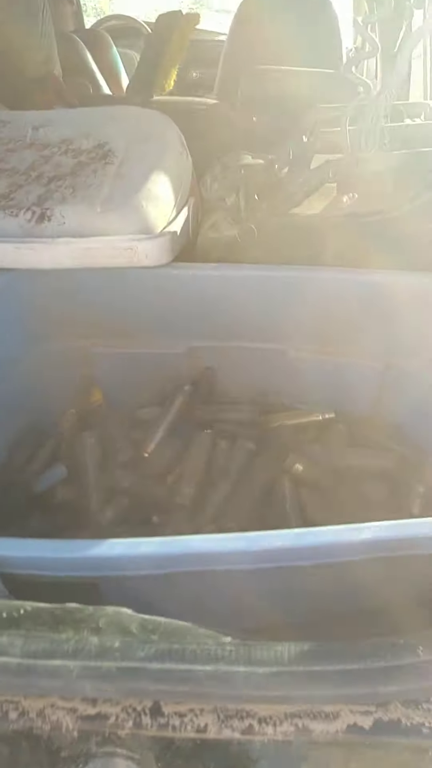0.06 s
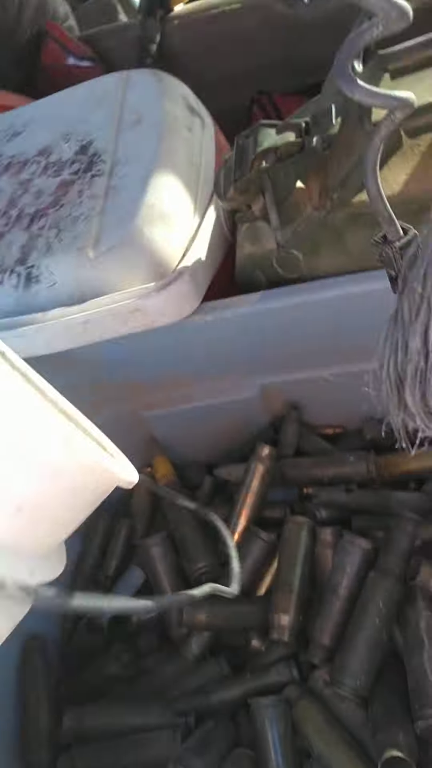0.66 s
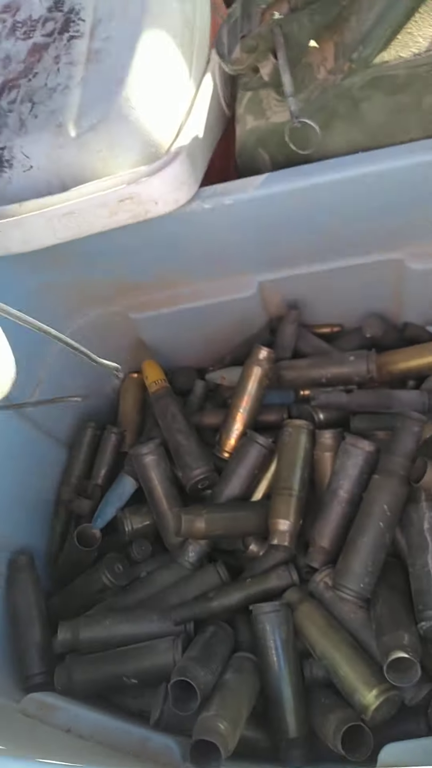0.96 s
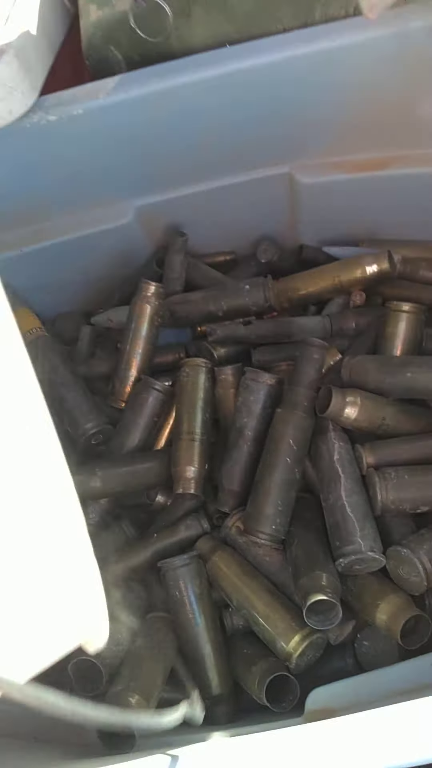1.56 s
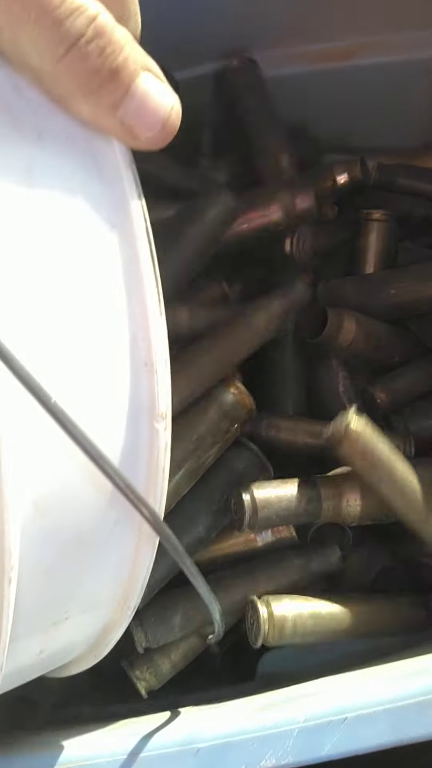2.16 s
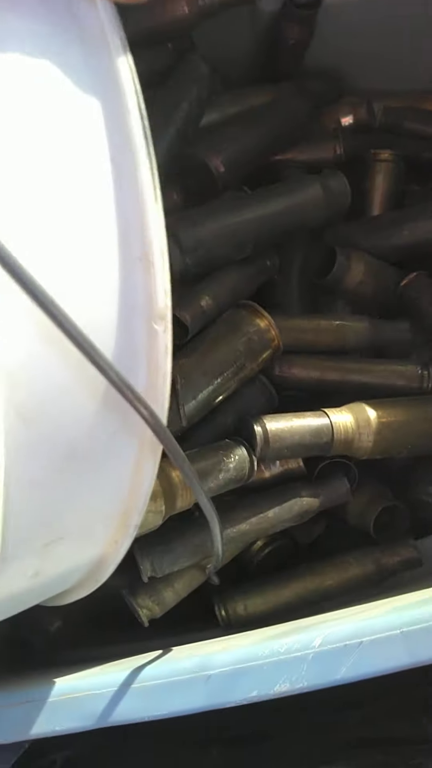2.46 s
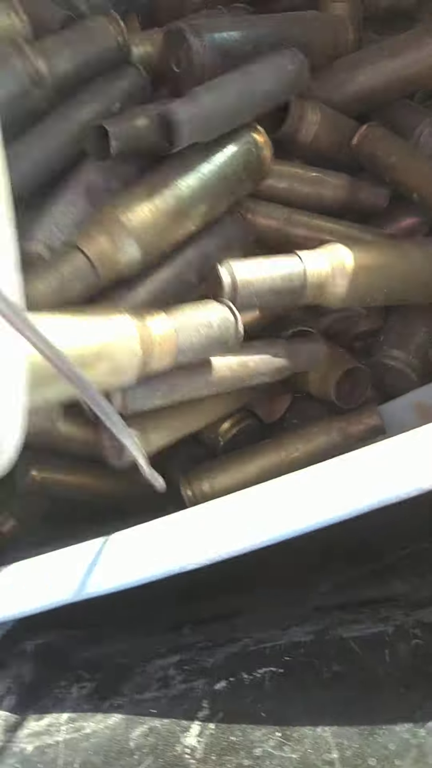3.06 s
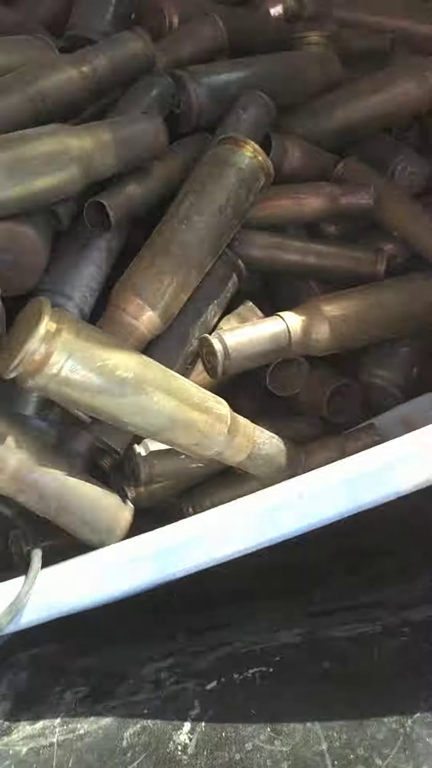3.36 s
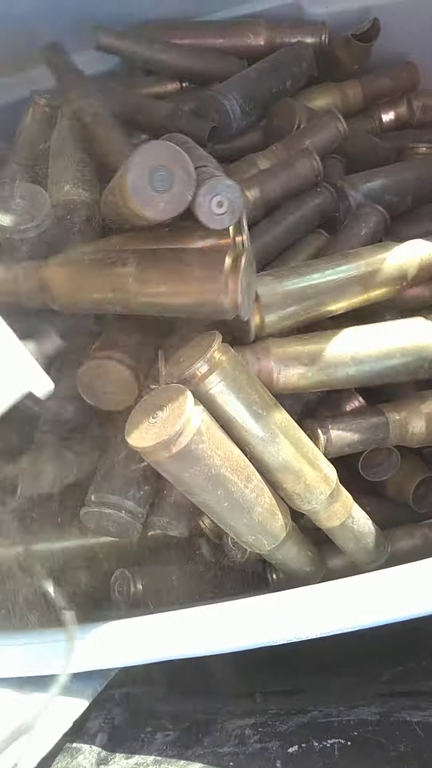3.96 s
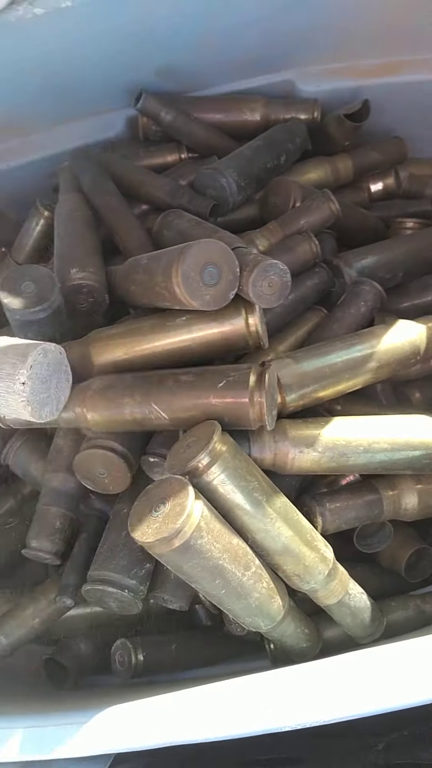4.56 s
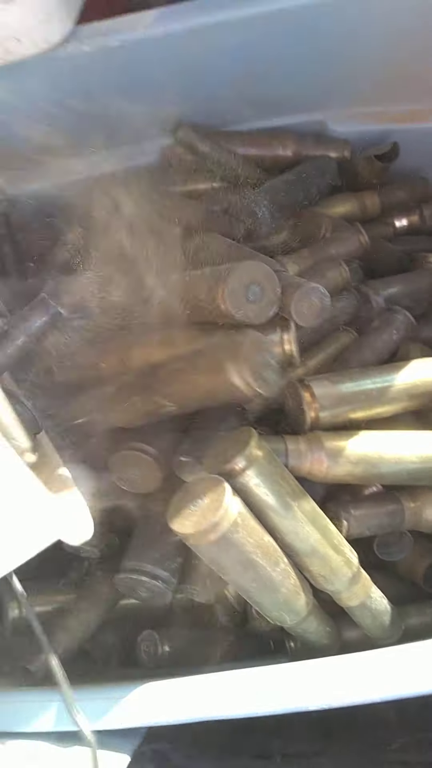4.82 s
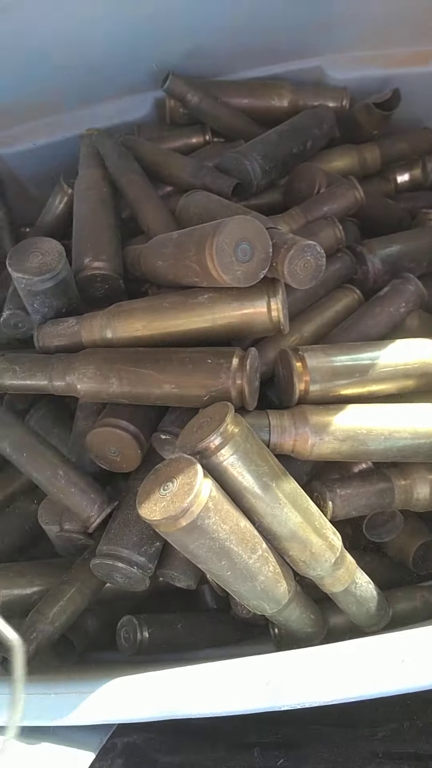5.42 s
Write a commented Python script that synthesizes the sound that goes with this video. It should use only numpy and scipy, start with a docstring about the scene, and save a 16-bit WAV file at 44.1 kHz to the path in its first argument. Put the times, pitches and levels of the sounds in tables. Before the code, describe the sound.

Empty metal shell casings slide out of a bucket and tumble onto a heap in a plastic bin, jingling and knocking.

```python
"""Outdoors, close to a plastic tote, on one small microphone: spent brass casings are poured from a
plastic bucket onto the heap inside. They slide and knock along the bucket wall, click on the heap
and ring with the few modes of a short tube; the tote booms under their weight.
The last ones drop singly and ring out over faint open air."""
import sys
import numpy as np
from scipy import signal
from scipy.fft import rfft, irfft
from scipy.io import wavfile
from scipy.ndimage import uniform_filter1d

SR = 44100
rng = np.random.default_rng(int(sys.argv[2]) if len(sys.argv) > 2 else 0)


def to_wav(sig):
    """Store sig (one row per channel, or 1-D mono) as 16-bit WAV at the path in sys.argv[1].

    Samples outside -1..1 are clipped; the rate is SR.
    """
    pcm = np.clip(np.atleast_2d(sig), -1, 1) * 32767
    pcm = np.round(pcm).astype(np.int16)
    wavfile.write(sys.argv[1], SR, pcm.T)  # frames by channels


N = 250929
TIME = np.arange(N) / SR

# batches of casings letting go: (start [s], length [s], bucket rattle [dB], brass jingle [dB],
# lowest brass mode [dB], heap clicking [dB])
SLIDES = [(-0.02, 0.16, -37, -44.5, -53.5, -49), (0.449, 0.078, -26.5, -40.5, -38, -37.5),
          (0.802, 0.21, -31, -35.5, -35, -35.5), (1.545, 0.19, -30, -33, -42, -38.5),
          (1.711, 0.13, -28.5, -27, -29.5, -27.5), (1.855, 0.13, -29, -26.5, -30, -31),
          (2.0, 0.46, -37, -25, -33.5, -35.5), (2.64, 0.28, -40, -46, -51.5, -52),
          (2.955, 0.33, -37.5, -46, -63, -50.5), (3.133, 0.077, -23.5, -29, -36, -31.5),
          (3.24, 0.095, -27, -32, -45, -35.5), (3.357, 0.11, -32.5, -31, -46.5, -38.5),
          (3.58, 0.15, -28.5, -39.5, -49, -39.5), (3.8, 0.28, -32, -28, -64, -35),
          (4.352, 0.08, -45, -66, -55, -51), (4.521, 0.14, -47, -41.5, -57, -44),
          (4.691, 0.19, -28.5, -36.5, -37, -39), (4.876, 0.11, -30, -28.5, -48.5, -34.5)]
# casings bouncing clear: (time [s], top mode [dB], second mode [dB], second mode [Hz],
# third mode [dB], t60 [s])
RINGS = [(0.0, -40, -34, 4970, -48, 0.44), (0.69, -38.5, -69, 4900, -48, 0.3),
         (1.286, -26.5, -44, 4850, -26, 0.31), (1.315, -29.5, -29, 4990, -32, 0.57),
         (1.75, -27, -17, 4950, -34, 0.13), (2.039, -18, -28.5, 5000, -36, 0.31),
         (2.315, -17, -27.5, 5160, -42, 0.13), (2.369, -21, -18, 4950, -18.5, 0.25),
         (2.455, -20, -20, 4990, -37, 0.13), (2.572, -22, -27, 4900, -42, 0.11),
         (2.824, -39.5, -51, 4900, -45, 0.8), (3.448, -26, -22, 4950, -35, 0.2),
         (3.778, -26, -32.5, 4800, -26, 1), (3.808, -15, -16, 4810, -15, 0.12),
         (3.985, -19.5, -29, 4800, -21, 0.3), (4.02, -20, -24, 5020, -30, 0.16),
         (4.226, -34.5, -40, 5070, -32.5, 0.26), (4.861, -20.5, -29, 4730, -26, 0.25),
         (5.018, -35, -22.5, 4890, -41, 0.46), (5.413, -27, -50, 4950, -54, 0.19),
         (5.461, -37, -35.5, 4870, -29, 0.33), (5.604, -33, -38, 4880, -45, 0.86)]
# half-damped casings: (time [s], level [dB], pitch [Hz], t60 [s])
CLINKS = [(0.309, -23.5, 3010, 0.037), (0.391, -23, 4550, 0.033), (0.651, -28, 2940, 0.044),
          (1.002, -28, 3090, 0.15), (1.135, -27.5, 3970, 0.15), (1.194, -28.5, 3990, 0.1),
          (1.721, -16.5, 4210, 0.079), (2.022, -17.5, 3090, 0.14), (2.331, -20, 3194, 0.11),
          (3.296, -13, 1910, 0.068), (4.054, -17, 1950, 0.043), (4.138, -21, 3260, 0.046),
          (4.253, -17, 2950, 0.022), (4.495, -20.5, 4020, 0.034), (4.574, -25.5, 4160, 0.04),
          (4.6, -28, 3080, 0.043), (4.623, -22, 3270, 0.028), (4.652, -19.5, 3290, 0.025),
          (5.178, -29, 3170, 0.072), (5.412, -26, 4030, 0.04), (5.594, -17, 1910, 0.058)]
# modes of the loaded tote: (pitch [Hz], level [dB], t60 [s])
TOTE_MODES = [(54, -41.5, 0.098), (67, -6, 0.29), (84.4, -17.5, 0.15), (97, -2.5, 0.16), (125, 1.5, 0.87),
              (148.8, -7, 0.24), (182.2, -1, 0.11), (204.6, -16, 0.75), (240, -3.5, 0.041),
              (269.4, -7, 0.092), (308.7, -3.5, 0.078), (355, -6.5, 0.15), (392.6, -1, 0.076),
              (447, -8, 0.11), (511, -6, 0.053), (510, -4.5, 0.021), (612, -0.5, 0.014)]
# colours of the bucket wall and of the brass heap: (frequency [Hz], spectral density [dB])
BUCKET_COLOUR = [(520, -0.5), (780, 5.5), (1000, 6.5), (1150, 2.5), (1350, 7.5), (1700, -0.5), (2000, 3.5),
                 (2400, -2), (3000, -4.5)]
HEAP_COLOUR = [(2400, -30), (3000, 13.5), (3500, 6.5), (4100, 5), (4900, 8.5), (5500, 5), (6400, 5.5),
               (7200, 2), (7800, -11), (8400, -21.5)]


def tumbling(tote_db, bucket_db, heap_db):
    """One stream of touches shakes the tote, rattles along the bucket wall and crackles on the heap."""
    # the rumble deepens as the load shifts from the bucket into the tote: (time [s], centre [Hz])
    rumble_centre = [(0.0, 286), (1.2, 253), (2.1, 125), (2.8, 150), (3.7, 109), (5.0, 121), (5.6, 74)]
    times, sizes = contacts(bucket_db, base_per_s=520, extra_per_s=380, spread_db=3)
    centre_hz = np.interp(times, *np.transpose(rumble_centre))
    tote = body(times, sizes, TOTE_MODES, uneven_db=5.5, aim_hz=centre_hz, db_per_octave=6)
    bucket = body(times, sizes, crowded_modes(BUCKET_COLOUR, t60=0.047, count=36), uneven_db=7)
    heap = body(times, sizes, crowded_modes(HEAP_COLOUR, t60=0.016, count=48), uneven_db=-0.5)
    return (from_db(tote_db - 1) * steady(tote, span_s=0.13)
            + from_db(bucket_db + 0.5) * steady(bucket, span_s=0.075)
            + from_db(heap_db + 2) * steady(heap, span_s=0.084))


def jingling(upper_db, lowest_db, width_hz=420, count=9):
    """Casings of nearly one size strike each other; their slightly unequal modes beat."""
    # modes of a casing: (pitch [Hz], level [dB], t60 [s], pitch spread between casings [share])
    tube_modes = [(3090, 0, 0.12, 0.037), (3950, -10.5, 0.28, 0.13), (4950, 0.5, 0.18, 0.018),
                  (5970, -8.5, 0.13, 0.026), (6180, -9, 0.37, 0.019), (6553, 0, 0.13, .006),
                  (7500, -11.5, 0.27, 0.18)]
    out = np.zeros(N)
    # the lowest mode sounds mainly when casings tumble loose, so it has a level of its own
    for level_db, modes in (upper_db - 0.5, tube_modes[1:]), (lowest_db + 0.5, tube_modes[:1]):
        times, sizes = contacts(level_db, base_per_s=130, extra_per_s=360, spread_db=3.5)
        struck = rng.integers(0, count, len(times))
        jingle = np.zeros(N)
        for hz, db, t60, spread in modes:
            chorus = np.zeros(N)
            offsets = rng.permutation(np.linspace(-1, 1, count)) + rng.normal(0, 0.18, count)
            for casing, offset in enumerate(offsets):
                hits = struck == casing
                force = clicks(times[hits], sizes[hits] * rng.standard_normal(hits.sum()))
                # a casing pressed by its neighbours is more out of tune and dies sooner
                pressed = 1 + abs(offset)
                chorus += ring(force, hz * (1 + spread * offset * pressed / 2), t60 / pressed)
            # the ring takes a moment to build up, so it stays narrow around its mode
            band_hz = [hz - width_hz / 2, hz + width_hz / 2]
            narrow = signal.butter(1, band_hz, "band", fs=SR, output="sos")
            jingle += from_db(db) * signal.sosfilt(narrow, chorus)
        out += from_db(level_db) * steady(jingle, span_s=0.05)
    return out


def landings(bucket_db, bounce_s=0.0051, bounce_db=-5):
    """A casing lands on one end, then slaps down with the other a moment later."""
    # the hardest landings: (time [s], clack [dB], clack pitch [Hz], tote [dB], heap click [dB])
    hard_knocks = [(0.26, -24.5, 1560, -35, -35), (0.391, -19.5, 2120, -57, -24),
                   (0.42, -14.5, 1950, -40.5, -27), (0.467, -8.5, 2270, -23, -20),
                   (0.482, -20, 750, -17, -38), (0.513, -13, 1470, -25, -31), (0.585, -28, 1310, -47, -36),
                   (0.785, -17.5, 2650, -29.5, -30), (0.836, -11, 2160, -31, -37),
                   (0.845, -17, 1380, -27, -41), (0.902, -16.5, 2180, -17, -21),
                   (0.936, -15, 1480, -23, -33), (1.078, -12, 1510, -26, -37), (1.105, -14, 2420, -22, -32),
                   (1.165, -14, 1470, -49, -39), (1.23, -20, 1580, -28.5, -33),
                   (1.285, -24.5, 1920, -42, -23.5), (1.304, -23, 790, -30, -23),
                   (1.362, -15.5, 1190, -22, -21.5), (1.427, -19.5, 2100, -57, -29.5),
                   (1.484, -25.5, 720, -26, -43), (1.556, -15.5, 791, -28.5, -27.5),
                   (1.613, -11, 1560, -20.5, -30), (1.697, -13.5, 1420, -19, -21.5),
                   (1.933, -13.5, 1490, -28, -21), (2.208, -21.5, 990, -34, -18.5),
                   (2.289, -30, 950, -24, -38), (2.367, -19.5, 950, -23.5, -45),
                   (2.451, -31, 1170, -22, -24.5), (2.571, -36, 1200, -46, -23.5),
                   (2.824, -21, 826, -36, -28), (3.155, -7, 1076, -28, -18.5), (3.185, -6, 1640, -25, -23),
                   (3.282, -6.5, 1980, -23, -27), (3.297, -7.5, 1470, -17.5, -26),
                   (3.307, -9, 1530, -39.5, -31), (3.372, -13, 1260, -25.5, -30),
                   (3.591, -20.5, 1900, -31.5, -33), (3.697, -17, 1020, -28.5, -25),
                   (3.725, -17, 1660, -34, -18.5), (3.778, -16, 1360, -35, -23),
                   (3.955, -17, 1310, -19.5, -22.5), (4.092, -20.5, 920, -27, -38),
                   (4.223, -27, 2800, -48, -31), (4.541, -22.5, 1223, -29.5, -30),
                   (4.622, -34, 1470, -35, -27), (4.652, -33, 2190, -46, -27.5),
                   (4.689, -12.5, 1920, -41, -33), (4.701, -12, 1296, -27.5, -27.5),
                   (4.759, -8, 1270, -25.5, -29), (4.816, -19, 985, -28, -39),
                   (4.844, -9, 1010, -19.5, -27), (4.913, -11, 1490, -36, -16),
                   (5.061, -26.5, 813, -33, -30.5), (5.177, -26.5, 1390, -36, -37.5),
                   (5.334, -35, 2200, -50, -40.5), (5.594, -21.5, 1870, -34, -26.5),
                   (5.668, -26.5, 2010, -34.5, -33)]
    s, clack_db, clack_hz, tote_db, heap_db = np.vstack([stray_knocks(bucket_db), hard_knocks]).T
    times = np.column_stack([s, s + bounce_s * rng.uniform(0.6, 1.4, len(s))]).ravel()
    pair_db = np.array([0, bounce_db])
    wall_modes = crowded_modes(BUCKET_COLOUR, t60=0.042, count=36)
    tote = body(times, from_db(tote_db[:, None] + pair_db + 22).ravel(), TOTE_MODES,
                uneven_db=0, aim_hz=360, db_per_octave=9.5)
    bucket = body(times, from_db(clack_db[:, None] + pair_db + 14.5).ravel(), wall_modes,
                  uneven_db=3, aim_hz=np.repeat(clack_hz, 2), db_per_octave=9)
    heap_modes = crowded_modes(HEAP_COLOUR, t60=0.075, count=44)
    heap = body(times, from_db(heap_db[:, None] + pair_db + 21.5).ravel(), heap_modes, uneven_db=11)
    hollow_note = tones(s, clack_db - 0.5, clack_hz, np.full(len(s), 0.022), rise_s=0.0025)
    return tote + bucket + heap + hollow_note


def stray_knocks(bucket_db, count=36, low_hz=750, high_hz=2200, above_db=7, scatter_db=10):
    """Rows for lesser landings at random, as strong as the flow allows."""
    when, pitch, strength = rng.random((count, 3)).T
    s = (np.arange(count) + when) / count * N / SR
    clack_db = np.interp(s, TIME, bucket_db) + above_db + scatter_db * (2 * strength - 1)
    clack_hz = low_hz * (high_hz / low_hz) ** pitch
    tote_db, heap_db = clack_db - 9, clack_db - 15
    return np.column_stack([s, clack_db, clack_hz, tote_db, heap_db])


def free_casings(first_hz=3080, third_hz=6170, top_hz=6510, pitch_spread=0.007):
    """A casing in the air rings on with four tube modes, the lowest dying first."""
    s, top_db, second_db, second_hz, third_db, t60 = np.transpose(RINGS)
    tuning = 1 + pitch_spread * rng.standard_normal((len(s), 3)).T
    first = tones(s, top_db - 6, first_hz * tuning[0], t60 * 0.38, rise_s=0.002)
    second = tones(s, second_db - 0.5, second_hz, t60, rise_s=0.0012)
    third = tones(s, third_db, third_hz * tuning[1], t60, rise_s=0.0089)
    top = tones(s, top_db - 0.5, top_hz * tuning[2], t60, rise_s=0.0025)
    return first + second + third + top


def clinking():
    """A half-damped casing sounds one short note."""
    return tones(*np.transpose(CLINKS), rise_s=0.0005)


def heap_clicks():
    """Brass meets brass: the sharp click at the start of a clink or a ring."""
    s, db = np.transpose([row[:2] for row in [*RINGS, *CLINKS]])
    return body(s, from_db(db + 13), crowded_modes(HEAP_COLOUR, t60=0.046, count=40), uneven_db=2)


def chinking(heap_db):
    """Sparser, harder touches: a casing wedged in the heap chinks briefly at a pitch of its own."""
    times, sizes = contacts(heap_db, base_per_s=40, extra_per_s=90, spread_db=3)
    chinks = body(times, sizes, crowded_modes(HEAP_COLOUR, t60=0.085, count=56), uneven_db=18)
    return from_db(heap_db + 1) * steady(chinks, span_s=0.07)


def tote_booms():
    """The tote wall booms under a blow, one low mode standing out."""
    # blows on the wall: (time [s], level [dB], pitch [Hz], t60 [s])
    blows = [(0.471, -9, 189, 0.17), (0.904, -18, 189, 0.15), (0.923, -15.5, 215, 0.2),
             (1.098, -14.5, 107, 0.072), (1.395, -11.5, 67, 0.084), (2.219, -6, 124, 0.064),
             (2.377, -9, 355, 0.046), (2.384, -10.5, 113, 0.13), (3.171, -12, 115, 0.15),
             (3.297, -21, 120, 0.18), (3.448, -10, 162, 0.067), (3.724, -16, 130, 0.23),
             (4.845, -16, 125, 0.29)]
    s, db, hz, t60 = np.transpose(blows)
    return tones(s, db - 2.5, hz, t60, rise_s=0.0028)


def open_air(rms_db=-47):
    """A faint outdoor rumble and hiss behind the pour."""
    # colour of the air: (frequency [Hz], spectral density [dB])
    air_colour = [(18, -36), (30, -2), (104, 18), (219, -14.5), (532, -4.5), (1390, -6.5), (1670, -39),
                  (4060, -31), (4780, -4), (6330, -30), (8000, -27.5), (10400, -50.5), (17600, -120)]
    hz = np.maximum(np.fft.rfftfreq(N, 1 / SR), 1)
    noise = irfft(rfft(rng.standard_normal(N)) * from_db(at_hz(air_colour, hz)), N)
    return from_db(rms_db) * noise / np.std(noise)


def sliding(levels_db, creep_db, release_db_per_s=136, sag_db_per_s=13, attack_s=0.011):
    """Level in dB of all slides over the creeping load: each starts quickly, loses pace and dies."""
    power = from_db(creep_db) ** 2
    for (start, length, *_), db in zip(SLIDES, levels_db):
        age = np.maximum(TIME - start, 0)
        fall_db = sag_db_per_s * age + release_db_per_s * np.clip(age - length, 0, 1)
        power += (from_db(db - fall_db) * (1 - np.exp(-age / attack_s))) ** 2
    return 10 * np.log10(power)


def contacts(flow_db, base_per_s, extra_per_s, spread_db, count=7000):
    """Random touches, most of them slight; they come faster as the flow swells."""
    position, chance, size = rng.random((count, 3)).T
    times = position * N / SR
    flow = from_db(np.interp(times, TIME, flow_db) - np.max(flow_db))
    happens = chance < (base_per_s + extra_per_s * flow) * N / SR / count
    return times, happens * from_db(spread_db * np.minimum(-np.log(size + 1e-9), 3))


def body(times, sizes, modes, uneven_db, aim_hz=1000, db_per_octave=0):
    """Each contact rings the modes with strengths of its own. A unit blow has energy 1."""
    pitches, levels, t60s = np.transpose(modes)
    swing, favour = rng.standard_normal((len(times), 2, len(modes))).transpose(1, 0, 2)
    # the struck spot favours a few modes; an aimed blow is weaker away from its pitch
    octaves = abs(np.log2(pitches / np.reshape(aim_hz, (-1, 1))))
    shares = swing * from_db(levels + uneven_db * favour - db_per_octave * octaves)
    shares /= np.linalg.norm(shares, axis=1, keepdims=True)
    heights = shares * np.sqrt(4 * np.log(1000) / (t60s * SR))
    return sum(ring(clicks(times, sizes * height), hz, t60)
               for height, hz, t60 in zip(heights.T, pitches, t60s))


def crowded_modes(colour, t60, count):
    """Many close modes, the high ones dying sooner: (pitch [Hz], level [dB], t60 [s])."""
    edges = np.geomspace(colour[0][0], colour[-1][0], count + 1)
    pitches = edges[:-1] + np.diff(edges) * rng.random(count)
    levels = at_hz(colour, pitches) + 10 * np.log10(np.diff(edges))
    return np.column_stack([pitches, levels, t60 * np.sqrt(edges[count // 2] / pitches)])


def tones(times, levels_db, pitches_hz, t60s, rise_s):
    """One sine for each blow; it swells while the contact chatters, then dies."""
    out = np.zeros(N)
    for s, db, hz, t60 in zip(times, levels_db, pitches_hz, t60s):
        start = max(int(s * SR), 0)
        age = TIME[:min(N - start, int(1.5 * t60 * SR))]
        envelope = from_db(db - 60 * age / t60) * (1 - np.exp(-age / rise_s))
        out[start:start + len(age)] += envelope * np.sin(2 * np.pi * hz * age)
    return out


def ring(force, hz, t60):
    """A unit click sets a sine of height 1 ringing."""
    decay, angle = from_db(-60 / (t60 * SR)), 2 * np.pi * hz / SR
    return signal.lfilter([0, np.sin(angle)], [1, -2 * decay * np.cos(angle), decay ** 2], force + 1e-18)


def clicks(times, sizes):
    """A train of impulses."""
    return np.bincount(np.clip(np.round(times * SR).astype(int), 0, N - 1), sizes, N)


def steady(x, span_s):
    """Hold the running rms at 1, so that only the grain is left."""
    size = max(int(span_s * SR), 8)
    power = uniform_filter1d(uniform_filter1d(x * x, size), size)
    return x / np.sqrt(np.maximum(power, 0) + 1e-4 * np.mean(x * x))


def at_hz(points, hz):
    """Read a spectrum on a log-frequency axis."""
    known_hz, level = np.transpose(points)
    return np.interp(np.log(hz), np.log(known_hz), level)


def from_db(db):
    """Decibels to gain."""
    return 10 ** (np.asarray(db) / 20)


def scene():
    """The pour and its single blows up close, the air behind, in mono."""
    # between slides the load creeps in the tilted bucket, less as it empties: (time [s], rattle [dB])
    creep = [(0.0, -47), (0.7, -39.5), (1.1, -40.5), (1.45, -42), (2.6, -46.5), (3.5, -37.5), (4.25, -53.5),
             (5.0, -55), (5.28, -55.5), (5.69, -50.5)]
    creep_db = np.interp(TIME, *np.transpose(creep))
    _, _, rattles, jingles, lowest, clickings = np.transpose(SLIDES)
    bucket_db = sliding(rattles, creep_db, release_db_per_s=158.5)   # plastic quiets sooner than brass
    jingle_db = sliding(jingles, creep_db - 8)   # creeping casings jingle little
    lowest_db = sliding(lowest, creep_db - 18)
    heap_db = sliding(clickings, creep_db - 8.5)
    flow_db = 20 * np.log10(np.hypot(from_db(bucket_db), from_db(jingle_db - 12)))
    tote_db = -32 + 0.68 * (flow_db + 33.5)   # the rumble partly follows swings about a middling flow
    stream = tumbling(tote_db, bucket_db, heap_db) + chinking(heap_db) + jingling(jingle_db, lowest_db)
    blows = landings(bucket_db) + free_casings() + heap_clicks() + clinking() + tote_booms()
    return (stream + blows + open_air())[None]


def record(dry, low_cut_hz=39, high_cut_hz=8100):
    """A small microphone: thin deep bass, and the top cut off."""
    thin = signal.sosfilt(signal.butter(4, low_cut_hz, "high", fs=SR, output="sos"), dry)
    return signal.sosfilt(signal.ellip(12, 0.2, 85, high_cut_hz, fs=SR, output="sos"), thin)


dry = scene()
out = record(dry)
to_wav(out)
```